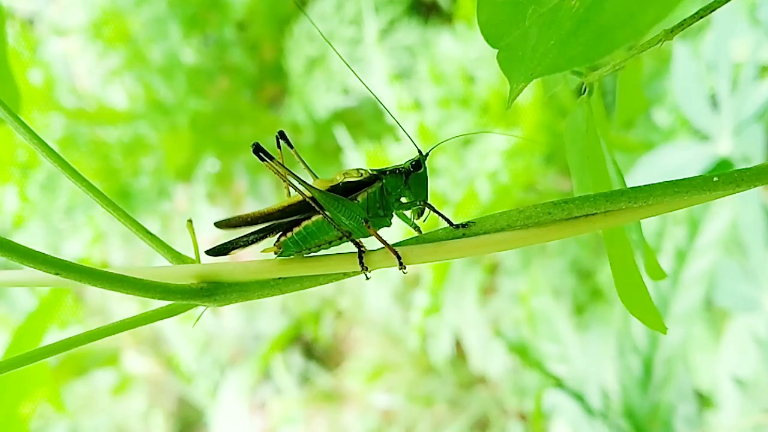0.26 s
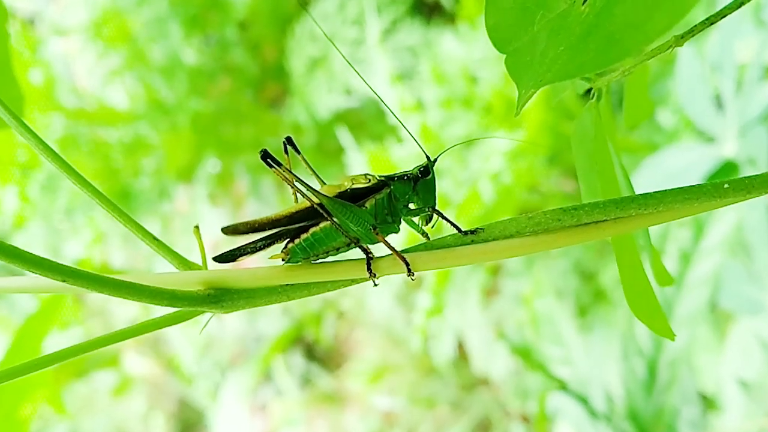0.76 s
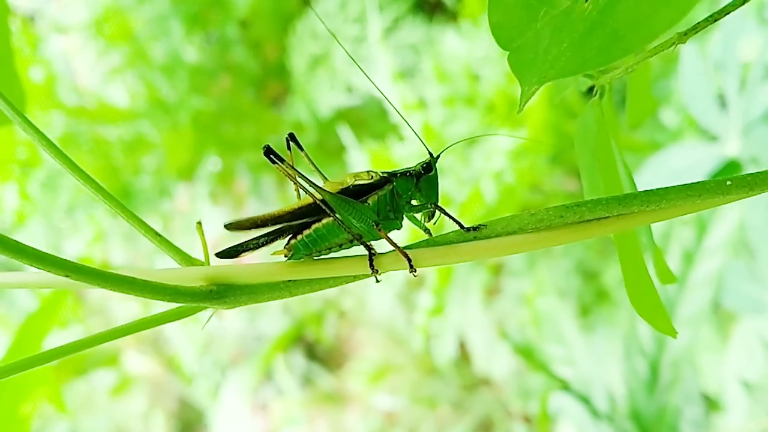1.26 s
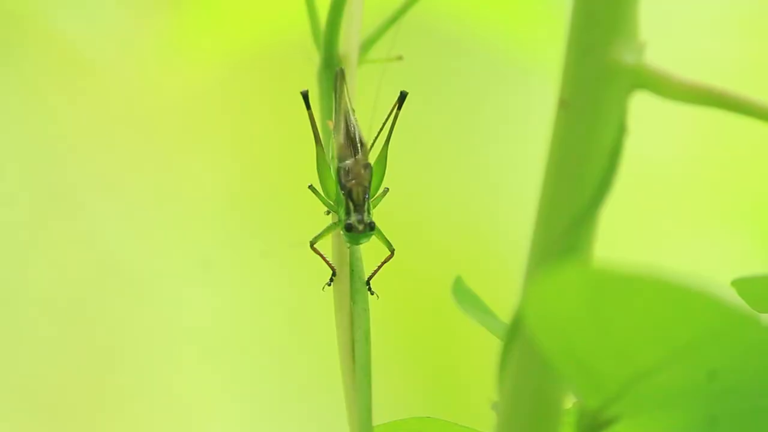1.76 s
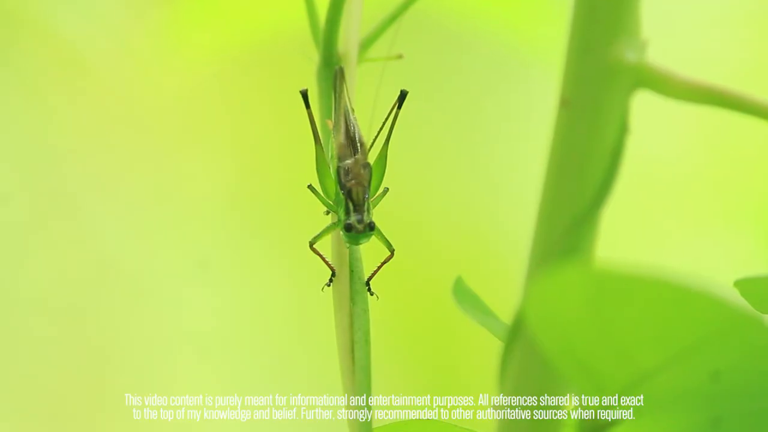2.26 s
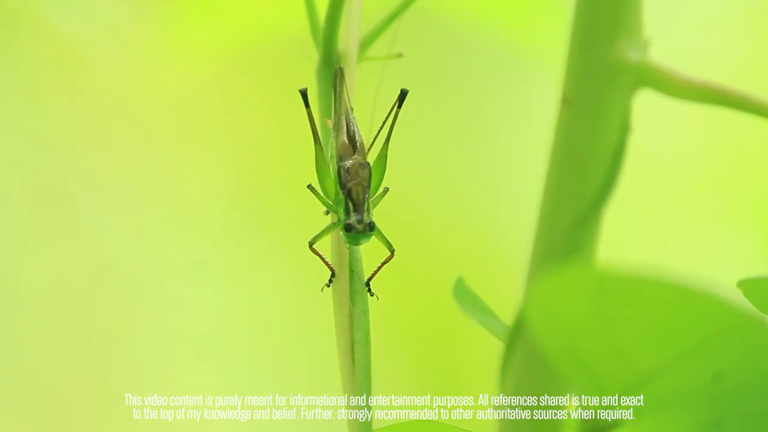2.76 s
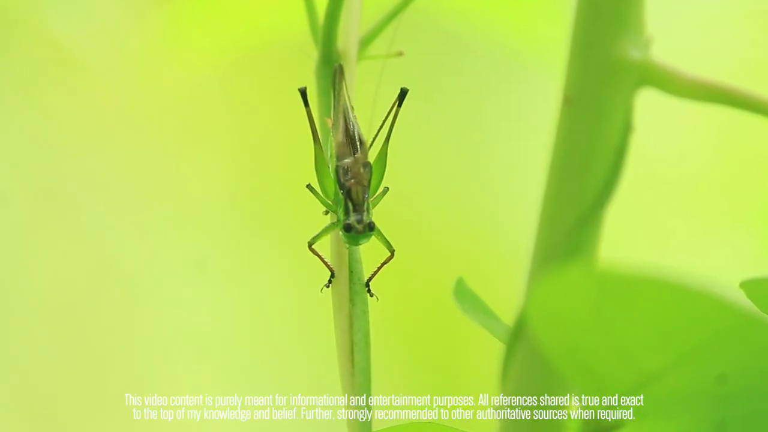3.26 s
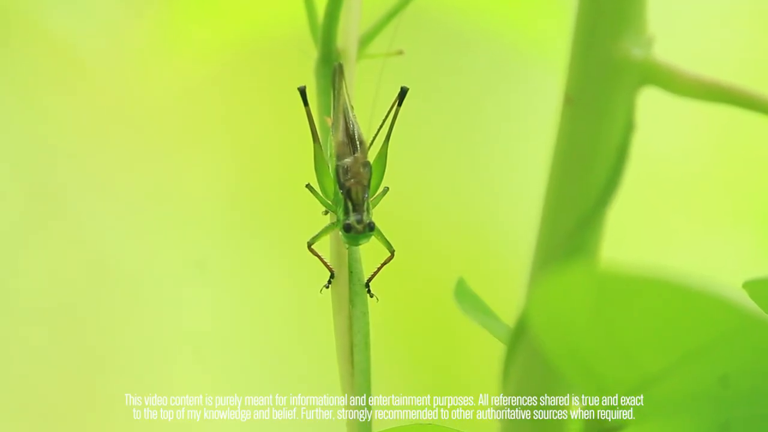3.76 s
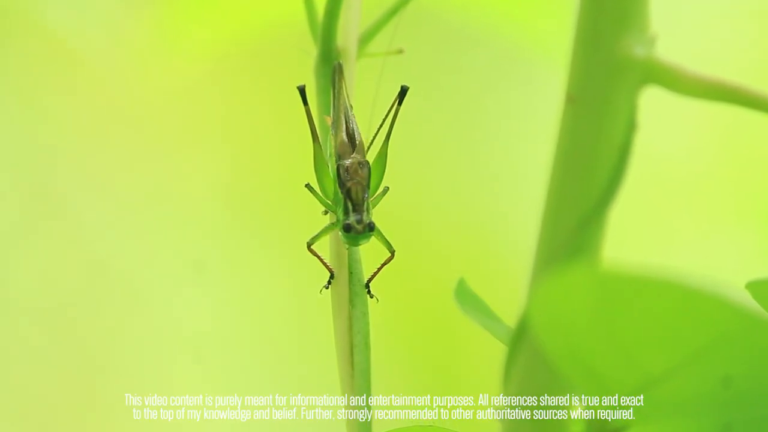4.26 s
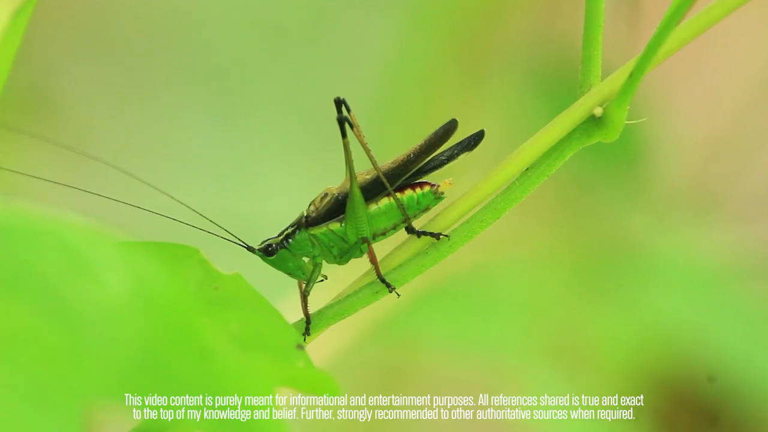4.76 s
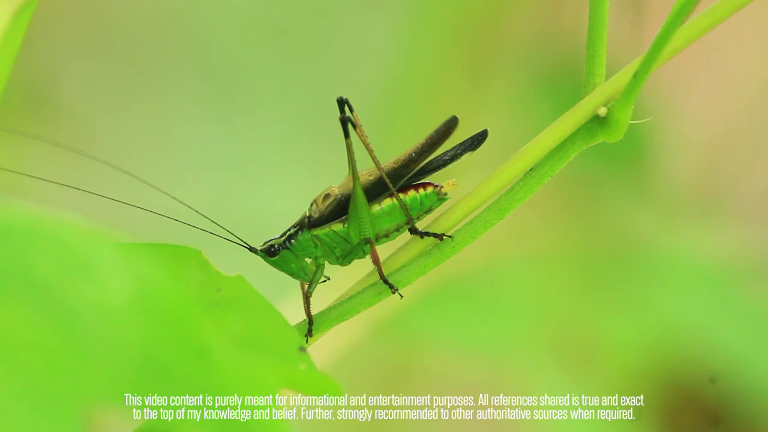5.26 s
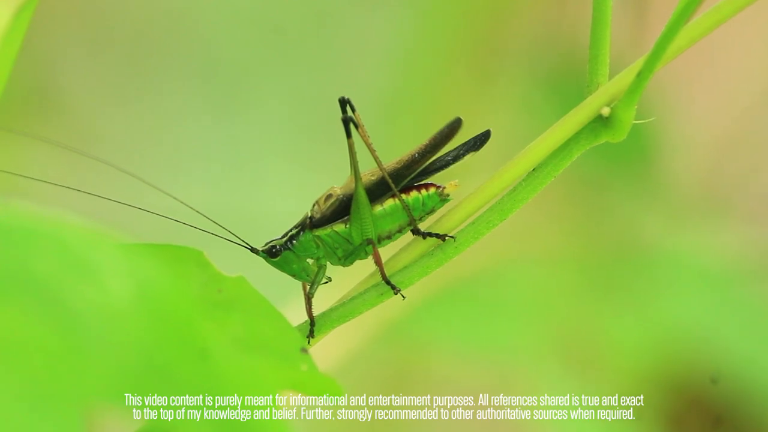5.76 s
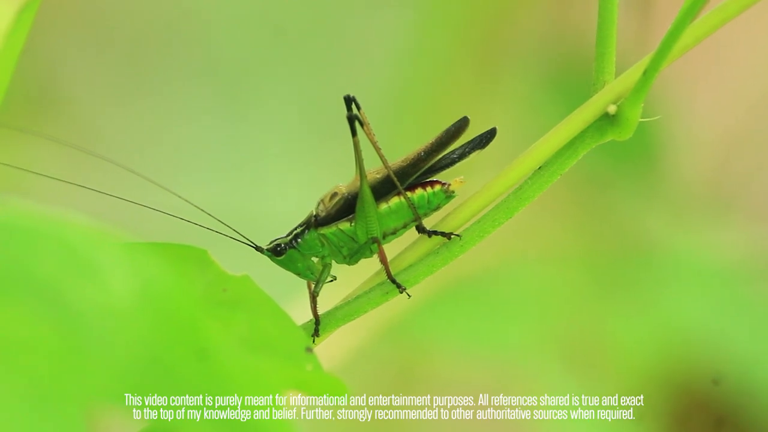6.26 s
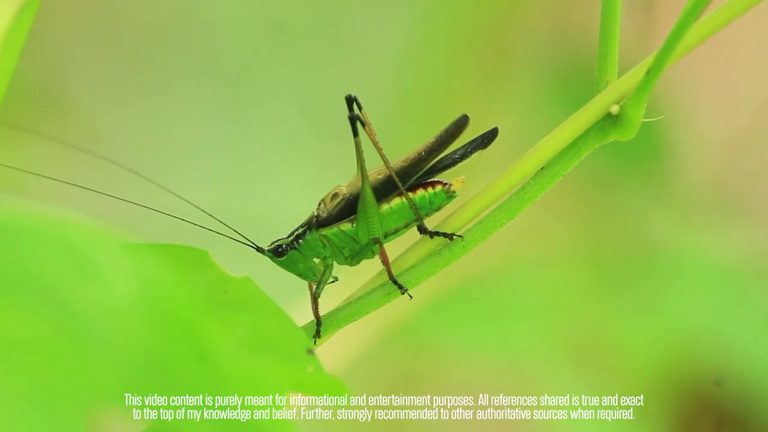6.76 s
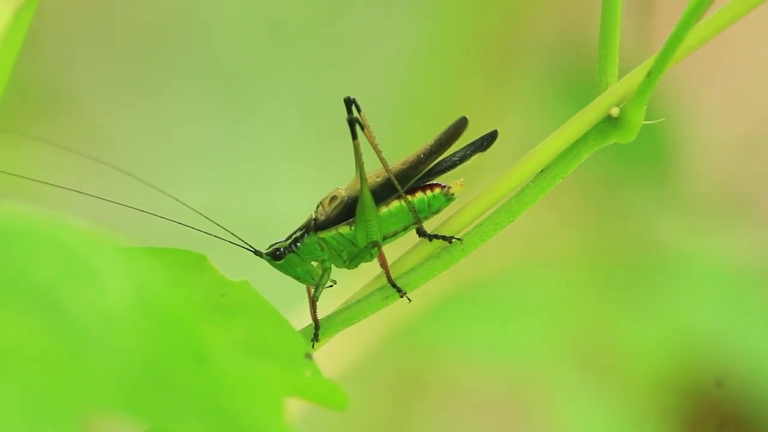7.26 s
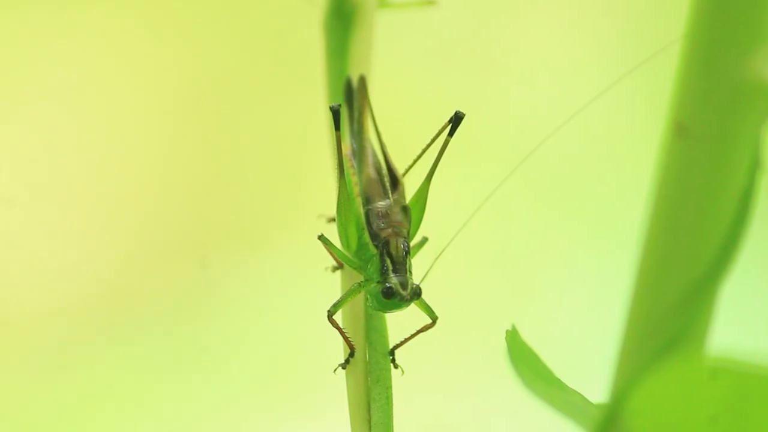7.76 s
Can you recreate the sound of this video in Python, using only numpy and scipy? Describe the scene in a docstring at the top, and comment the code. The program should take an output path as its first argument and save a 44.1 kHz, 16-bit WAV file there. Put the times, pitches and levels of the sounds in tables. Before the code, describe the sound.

A katydid buzzes close by, a thin, very high, rapidly pulsing metallic hiss with a dry rasp, over faint garden air and low rumble.

```python
"""A katydid buzzes close to the microphone, closing its wings 20 to 23 times a second.
The scraper ticks over the file, exciting a dry rasp and a ringing of the wing membrane near 13.7 kHz.
Behind it are shaped noises for garden air, a far rumble and rustles, a wavering low drone,
faint knocks of ringing modes, and high peeps of narrow-band noise. One stretch plays in a loop."""
import sys
import numpy as np
from scipy import signal
from scipy.fft import rfft, irfft
from scipy.io import wavfile
from scipy.ndimage import uniform_filter1d, map_coordinates

SR = 44100
rng = np.random.default_rng(int(sys.argv[2]) if len(sys.argv) > 2 else 0)


def to_wav(s):
    """Save 16-bit WAV."""
    ch = np.atleast_2d(s).T  # columns
    pcm = np.round(np.clip(ch, -1, 1) * 32767)  # PCM
    wavfile.write(sys.argv[1], SR, pcm.astype(np.int16))


N = 353020
T = np.arange(N) / SR
START_S, LOOP_S = .069, 4.814376  # the stretch that repeats


def amp(db):
    """Level to amplitude: 20 dB is a factor of ten."""
    return 10 ** (np.asarray(db) / 20)


def evened(x):
    """Normalization of power: scales to rms 1."""
    return x / np.sqrt(np.mean(x ** 2) + 1e-20)


def add(mix, s, sound):
    """Superposition: sums a sound into the mix from time s, in place."""
    part = mix[max(round(s * SR), 0):][:len(sound)]
    part += sound[:len(part)]


def ring(x, spectrum, size=4096):
    """Minimum-phase resonance: a body with this spectrum rings after each blow, never before it."""
    hz, db = np.transpose(spectrum)
    f = abs(np.fft.fftfreq(size, 1 / SR))
    log_gain = np.log(amp(np.interp(np.log(f + 1), np.log(hz), db)))
    # the Hilbert transform of the log gain gives the minimum phase
    response = np.fft.ifft(np.exp(np.conj(signal.hilbert(log_gain)))).real
    return evened(signal.oaconvolve(x, response)[:len(x)])


def band_noise(hz, width_hz, count):
    """Filtered noise: one resonance, its amplitude halved at the edges of its width."""
    f = np.fft.rfftfreq(count, 1 / SR)
    resonance = 1 / (1 + ((f - hz) / width_hz * 2) ** 2)
    return evened(irfft(rfft(rng.standard_normal(count)) * resonance, count))


def wander(rate_hz):
    """Low-frequency random modulation: noise of rms 1 under a Gaussian lowpass of this rate."""
    f = np.fft.rfftfreq(N, 1 / SR)
    lowpass = np.exp(-(f / rate_hz) ** 2)
    return evened(irfft(rfft(rng.standard_normal(N)) * lowpass, N))


def shimmer(x, depth_db, width_hz, length_s, size=1024):
    """Spectral modulation: the colour drifts in random patches over time and frequency."""
    overlap = size * 3 // 4
    hz, t, z = signal.stft(x, SR, nperseg=size, noverlap=overlap)
    rows, columns = np.meshgrid(hz / width_hz, t / length_s, indexing="ij")
    patches = map_coordinates(rng.standard_normal((512, 512)), [rows, columns], order=1, mode="wrap")
    coloured = z * amp(depth_db * evened(patches))
    return evened(signal.istft(coloured, SR, nperseg=size, noverlap=overlap)[1][:len(x)])


def foliage(x, echo_db, reach_s=0.032, count=14):
    """Multipath interference: nearby leaves return a few weak echoes, which comb the spectrum."""
    out = x.copy()
    echo_gain = amp(echo_db) / np.sqrt(count)
    for delay, sign in zip(rng.uniform(.002, reach_s, count), rng.choice([-1, 1], count)):
        add(out, delay, sign * echo_gain * x)
    return out


def strokes():
    """Rhythm by phase accumulation: one closing stroke a beat; start_s, ring_db and rasp_db of each."""
    # how fast the wings beat: time_s, strokes_per_s
    wing_rate = [(0.1, 20.36), (0.3, 22.91), (0.61, 21.41), (0.93, 22.76), (1.15, 20.18), (1.33, 22.66),
                 (1.47, 20.69), (2.66, 21.84), (3.81, 21.73), (3.92, 20.98), (4.53, 22.35), (4.8, 21.18)]
    # how hard the insect sings, as the nominal level of the membrane's ring: time_s, level_db
    effort = [(0.1, -17.5), (0.25, -18), (0.3, -21), (0.42, -17), (0.45, -19), (0.6, -16.5), (0.65, -21.5),
              (0.71, -16), (0.8, -20.5), (0.85, -14.5), (1.0, -20.5), (1.14, -18), (1.17, -22.5),
              (1.25, -16), (1.47, -20), (1.49, -21.5), (1.65, -18.5), (1.71, -18), (1.76, -23.5),
              (1.79, -16.5), (1.96, -21), (2.3, -16.5), (2.63, -18.5), (2.72, -18), (2.86, -18.5),
              (3.02, -17.5), (3.08, -19), (3.26, -19), (3.5, -18.5), (3.81, -19.5), (3.89, -23),
              (4.05, -19.5), (4.12, -21), (4.16, -18), (4.25, -25), (4.33, -18), (4.52, -20.5), (4.63, -19),
              (4.72, -22.5), (4.82, -14), (4.84, -24)]
    # no two strokes are alike: scatter of their timing, ring and rasp
    jitter_s, ring_scatter_db, rasp_scatter_db = 0.00053, 0.9, 0.27
    beats = np.cumsum(np.interp(T, *np.transpose(wing_rate))) / SR
    beats -= np.interp(START_S, T, beats)
    s = np.interp(np.arange(int(beats[-1])), beats, T)
    late, ring_luck, rasp_luck = rng.standard_normal((len(s), 3)).T
    ring_level = np.interp(s, *np.transpose(effort)) + ring_scatter_db * ring_luck
    # the rasp does not follow the effort
    return s + jitter_s * late, ring_level, rasp_scatter_db * rasp_luck


def teeth(rate_hz, jitter, uneven_db):
    """Impulse excitation: the scraper ticks over the unevenly spaced teeth of the file."""
    tooth_rate = rate_hz * np.exp(jitter * wander(rate_hz))
    passed = np.floor(np.cumsum(tooth_rate) / SR)
    ticks = np.diff(passed, prepend=0) > 0
    return ticks * amp(uneven_db * rng.standard_normal(N))


def packets(grip_db):
    """Stick-slip friction: the scraper slips in packets of about two milliseconds, each its own strength."""
    slip_hz, slip_jitter, slip_db = 400, .4, 5.5  # nominal rate, its unevenness, depth below the floor of 1
    slips = np.cumsum(slip_hz * np.exp(slip_jitter * wander(slip_hz))) / SR
    strength = amp(grip_db * np.tanh(rng.standard_normal(N)))[slips.astype(int)]
    return evened(amp(-slip_db) + strength * np.sin(np.pi * slips) ** 2)


def snags(hz=13620, spread_hz=120):
    """Phase locking: teeth in step with the membrane sound a tone; returns it and its share of the motion."""
    # the scraper catches and lets go with a bright flick; the hardest catches: peak_s, nominal level_db
    catches = [(.258, -12), (.265, -9.6), (.349, -10.2), (.588, -10.1), (.603, -12), (.699, -11.6),
               (.852, -8.3), (.863, -9.5), (.873, -11.6), (.902, -10.6), (1.266, -9.4), (1.272, -11.6),
               (1.374, -11.6), (1.449, -9.8), (1.658, -10.7), (1.695, -12.2), (1.711, -12), (1.804, -10.6),
               (1.928, -8.1), (2.071, -7.9), (2.162, -11.8), (2.169, -11.8), (2.213, -11.3), (2.278, -12),
               (2.306, -9.3), (2.355, -11.3), (2.497, -9.7), (2.723, -11), (2.762, -11.3), (2.945, -12),
               (2.995, -10.6), (3.357, -12), (3.641, -7.6), (3.736, -12), (3.771, -11.8), (4.007, -14),
               (4.743, -12.5), (4.755, -10.7), (4.8, -11.5)]
    rise_s = .0016
    tone, share = np.zeros(N), np.zeros(N)
    t = np.arange(0, 10 * rise_s, 1 / SR)
    swell = (t / rise_s * np.exp(1 - t / rise_s)) ** 1.5
    detunes = 2 * rng.random(len(catches)) - 1
    for (s, db), detune in zip(catches, detunes):
        pitch = evened(np.sin(2 * np.pi * (hz + spread_hz * detune) * t))
        add(tone, s - rise_s, amp(db + 1.4) * swell * pitch)
        add(share, s - rise_s, swell)
    chatter = amp(2 * np.tanh(wander(900)))
    return tone * chatter, np.clip(share, 0, 1)


def katydid():
    """Stridulation: each stroke's ticks excite the wing and its membrane, and the wing covers brush."""
    # nominal pressure of the scraper along a stroke: time_after_start_s, pressure_db
    pressure_curve = [(-.005, -9), (-.0015, -0.5), (.0015, 1.04), (.007, 2.5), (.012, 1), (.018, 0.3),
                      (.023, -1), (.029, -1.4), (.034, -3.5), (.040, -7.5)]
    # the membrane's answer to one tooth: frequency_hz, relative level_db
    membrane_spectrum = [(10000, -50), (11800, -27), (12250, -19), (12550, -12), (12900, -14), (13150, -8),
                         (13530, -3.5), (13650, -1), (13840, 0), (13930, -2), (14000, -26), (14600, -60)]
    # the whole wing's answer to one tooth: frequency_hz, relative level_db
    rasp_spectrum = [(1000, -52), (4700, -25), (5100, -15), (5700, -10.5), (6200, -11.5), (7000, -3),
                     (7400, -3.5), (7720, 2), (8050, 0), (8790, 3.5), (10000, 3), (10700, 0.5), (11550, 5),
                     (13900, 2.5), (14050, -7.5)]
    # the soft brush of the wing covers against each other: frequency_hz, relative density_db_per_hz
    brush_spectrum = [(40, -17), (75, -8), (130, 9), (400, 4), (1000, -1.5), (2400, 1), (3800, -4.5),
                      (4700, -14), (7000, -40)]
    ring_db, rasp_db, brush_db = 1.3, -25, -52  # the first is added to the stroke's ring level
    ring_depth, rasp_depth, brush_depth = 1.09, 1.03, 4.5  # dB per dB of pressure
    s, ring_level, rasp_level = strokes()
    stroke = np.clip(np.searchsorted(s + pressure_curve[0][0], T) - 1, 0, len(s) - 1)
    pressure_db = np.interp(T - s[stroke], *np.transpose(pressure_curve))

    membrane = ring(teeth(rate_hz=4800, jitter=.35, uneven_db=5.0), membrane_spectrum)
    # the membrane partly paces the teeth, which evens out its swing
    envelope = abs(signal.hilbert(membrane))
    membrane = evened(membrane / (envelope + 0.13) ** 0.52)
    membrane_level = ring_level[stroke] + ring_db + ring_depth * pressure_db
    membrane = membrane * packets(grip_db=5.0) * amp(membrane_level)
    tone, share = snags()
    membrane = foliage(membrane * (1 - share) + tone, echo_db=-17)

    # only the harder tooth strikes shake the whole wing: a sparser, drier grain
    strikes = teeth(rate_hz=2600, jitter=.65, uneven_db=2)
    strike_level = rasp_level[stroke] + rasp_depth * pressure_db + 1.38 * wander(120)
    rasp = ring(strikes * amp(strike_level), rasp_spectrum)
    # the wings meet a little differently on every stroke
    rasp = shimmer(rasp, depth_db=2.7, width_hz=150, length_s=.045, size=512)
    rasp = foliage(rasp, echo_db=-13)
    singing = (T > START_S) & (T < START_S + LOOP_S)
    rasp = rasp / rasp[singing].std()

    brush_swell = amp(brush_depth * uniform_filter1d(pressure_db, size=300))
    brush = evened(ring(rng.standard_normal(N), brush_spectrum) * brush_swell)
    return membrane + amp(rasp_db) * rasp + amp(brush_db) * brush


def garden():
    """Turbulence noise: air and a lumpy far rumble swell with the breeze, with leafy hiss and a drone."""
    # garden air: frequency_hz, relative density_db_per_hz
    air_spectrum = [(100, -22.5), (200, -6), (400, -2.5), (750, -4.5), (1000, -4.5), (1500, -8),
                    (2100, -6.5), (3200, -9), (4400, -8), (6000, -69), (10000, -57)]
    # far rumble: frequency_hz, relative density_db_per_hz
    rumble_spectrum = [(12, -40), (20, -18), (31, -21), (44, -9), (58, -13), (81, -1.5), (220, -11),
                       (290, -33), (480, -120)]
    # nominal levels of the air and the rumble: time_s, air_db, rumble_db
    breeze = [(0.07, -47.5, -51), (0.57, -49, -38.5), (0.71, -48, -45), (1.5, -49, -43), (1.98, -48.5, -44),
              (2.12, -51.5, -46.5), (3.52, -52.5, -47), (3.93, -48, -47), (4.73, -49, -44),
              (4.879, -48, -47)]
    # a low drone that comes and goes: time_s, level_db
    drone_level = [(0, -84), (1.1, -68), (1.4, -55.5), (2.45, -49.5), (2.8, -80), (4.5, -77), (4.6, -40.5),
                   (4.88, -48.5)]
    air_db, rumble_db = 1.74, -1.5  # added to the breeze levels
    gust_db, leaf_db, drone_hz = -53, -55, 88
    s, *levels = np.transpose(breeze)
    air_level, rumble_level = (np.interp(T, s, level) for level in levels)
    air = ring(rng.standard_normal(N), air_spectrum)
    air = shimmer(air, depth_db=2.5, width_hz=411, length_s=.025, size=512)
    air = air * amp(air_level + air_db)
    # the low whoosh grows twice as fast, in dB, as the air when the breeze picks up
    gust_level = gust_db + 2 * (air_level - air_level.mean())
    gust = band_noise(hz=306, width_hz=600, count=N) * amp(gust_level)
    rumble = ring(rng.standard_normal(N), rumble_spectrum, size=16384)
    rumble = rumble * amp(rumble_level + rumble_db + 1.5 * wander(26.0))
    hiss = band_noise(hz=2370, width_hz=2050, count=N)
    leaves = amp(leaf_db) * shimmer(hiss, depth_db=4, width_hz=130, length_s=.05)
    turns = np.cumsum(drone_hz * (1 + 0.027 * wander(7.7))) / SR
    drone = amp(np.interp(T, *np.transpose(drone_level))) * evened(np.sin(2 * np.pi * turns))
    # small eddies make all but the drone flutter
    flutter = amp(.9 * wander(30))
    return (air + gust + rumble + leaves) * flutter + drone


def rustles():
    """Windowed noise bursts: short soft swells, some gliding by a chirped frequency shift."""
    # the high ones leaves brushing, the low ones far rumble:
    # start_s, length_s, level_db, centre_hz, width_hz, glide_hz_per_s
    swells = [(0.137, 0.078, -41.5, 3250, 1000, -4000), (0.16, 0.082, -41.5, 2600, 1700, 0),
              (1.078, 0.067, -46.5, 2940, 900, 0), (0.999, 0.17, -38.5, 68, 40, 0),
              (1.308, 0.088, -39, 72, 50, 0), (2.037, 0.059, -47, 3300, 300, 0),
              (4.077, 0.21, -46, 139, 50, 0), (4.148, 0.47, -47, 212, 60, -2),
              (4.308, 0.1, -42.5, 3460, 2400, 0), (4.399, 0.078, -42, 3140, 2400, 0),
              (4.514, .046, -36.5, 1400, 560, 23000), (4.528, 0.076, -44, 2060, 550, 4000)]
    out = np.zeros(N)
    for s, length, db, hz, width, glide in swells:
        count = round(length * SR)
        t = np.arange(count) / SR - length / 2
        noise = signal.hilbert(band_noise(hz, width, SR))[:count]
        swish = (noise * np.exp(1j * np.pi * glide * t ** 2)).real
        add(out, s, amp(db) * np.hanning(count) * swish)
    return out


def knocks():
    """Modal decay: distant blows ring a few modes; the garden adds a scattered tail and one distinct echo."""
    # faint far knocks: start_s, nominal level_db
    blows = [(1.162, -41), (1.193, -44), (1.532, -40), (1.726, -36), (2.033, -48)]
    # what they ring with: frequency_hz, decay_per_s (times 4: width of the scatter in hz), level_db
    blow_modes = [(130, 40, -6), (969, 75, -8), (1320, 75, -8), (1550, 130, -11), (1826, 55, 0),
                  (1895, 110, -4), (1985, 75, -3), (2430, 80, -15)]
    rise_s, gain_db, scatter_db = 0.003, 5.0, -5
    t60_s, tail_db, tail_t60_s = .055, -13, 0.5  # the scatter fades fast, then slowly
    echo_s, echo_db = .048, -8.5
    out, t = np.zeros(N), np.arange(SR // 2) / SR
    rise = 1 - np.exp(-t / rise_s)
    fade = amp(-60 * t / t60_s) + amp(tail_db - 60 * t / tail_t60_s)
    for s, db in blows:
        modes, scatter = np.zeros(len(t)), np.zeros(len(t))
        for hz, decay, level in blow_modes:
            modes += amp(level) * np.exp(-decay * t) * np.sin(2 * np.pi * (hz * t + rng.random()))
            scatter += amp(level) * band_noise(hz, 4 * decay, len(t))
        blow = amp(db + gain_db) * rise * (modes + amp(scatter_db) * fade * evened(scatter))
        add(out, s, blow)
        add(out, s + echo_s, amp(echo_db) * blow)
    return out


def whistles():
    """Narrow-band noise under exponential decay: breathy peeps far off, each fading into the garden."""
    # faint high peeps: start_s, level_db
    peeps = [(2.062, -47.5), (2.203, -49.5), (2.29, -53.5), (2.39, -54.5), (2.76, -54), (2.91, -53),
             (2.98, -51), (3.1, -53.5), (3.22, -53.5), (3.63, -49), (3.73, -53.5), (3.87, -52.5)]
    rise_s, t60_s = .008, .45
    out, t = np.zeros(N), np.arange(SR // 2) / SR
    shape = np.minimum(t / rise_s, 1) * amp(-60 * t / t60_s)
    for s, db in peeps:
        add(out, s, amp(db) * shape * band_noise(hz=3320, width_hz=130, count=len(t)))
    return out


def scene():
    """Superposition: the insect and its garden sum into one channel."""
    return (katydid() + garden() + rustles() + knocks() + whistles())[None]


def record(dry):
    """Periodic repetition and band limiting: a moment of silence, one stretch looped, a steep lowpass."""
    edge_hz = 13975
    first, count = round(START_S * SR), round(LOOP_S * SR)
    looped = np.zeros_like(dry)
    looped[:, first:] = dry[:, first + np.arange(N - first) % count]
    lowpass = signal.firwin(2047, edge_hz, window=("kaiser", 9), fs=SR)
    return signal.oaconvolve(looped, lowpass[None], "same")


dry = scene()
out = record(dry)
to_wav(out)
```